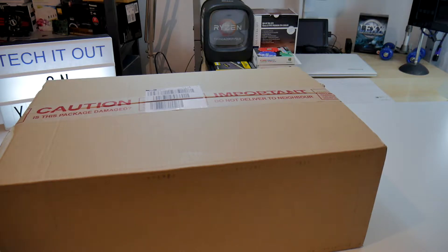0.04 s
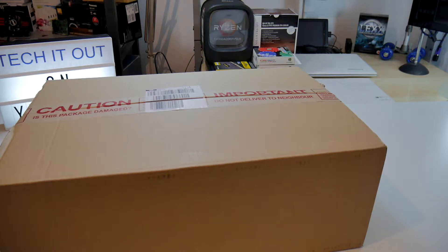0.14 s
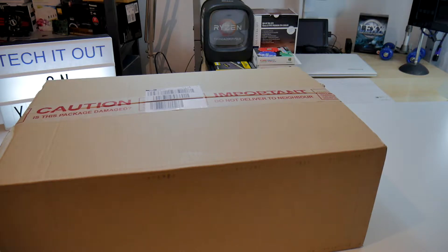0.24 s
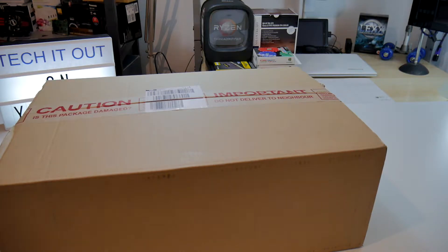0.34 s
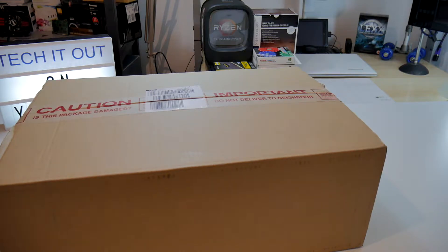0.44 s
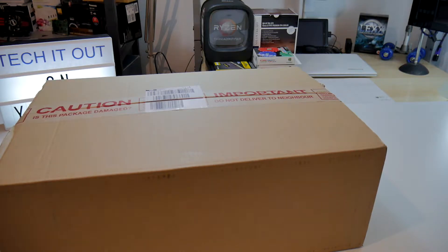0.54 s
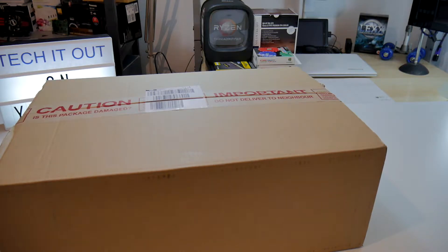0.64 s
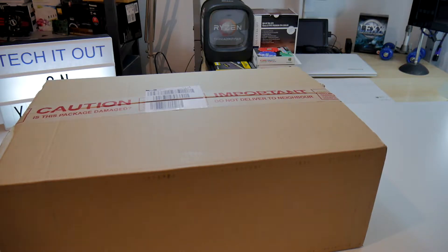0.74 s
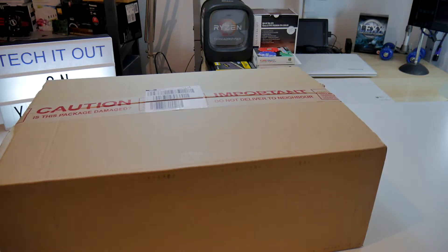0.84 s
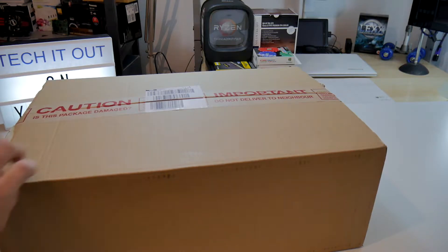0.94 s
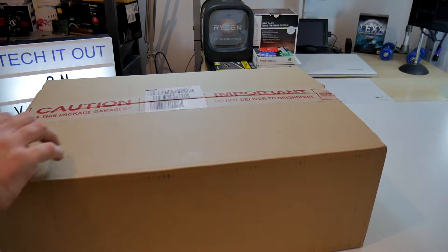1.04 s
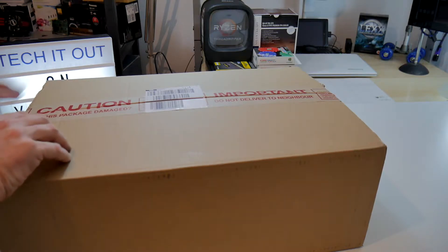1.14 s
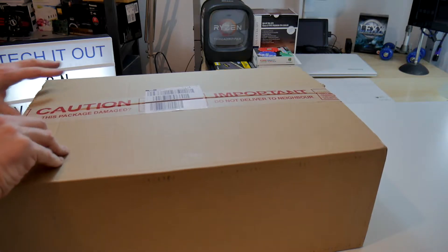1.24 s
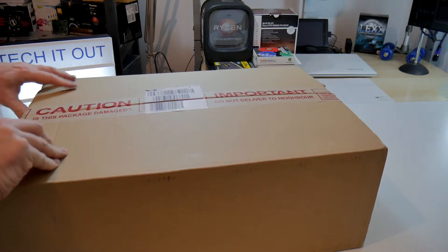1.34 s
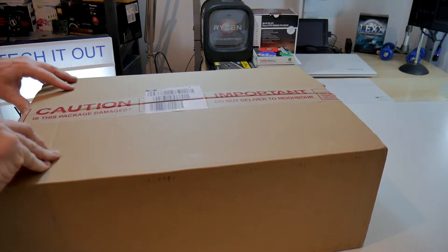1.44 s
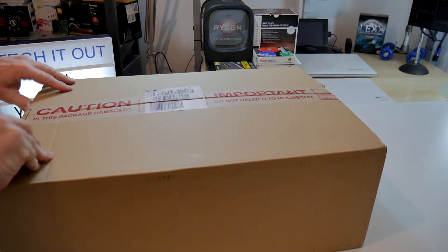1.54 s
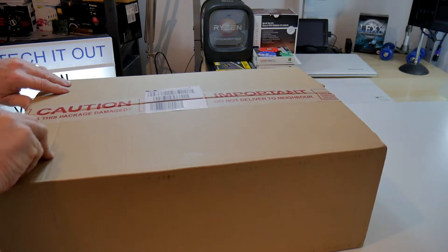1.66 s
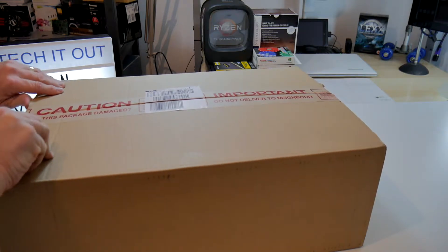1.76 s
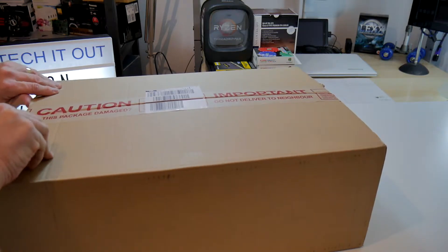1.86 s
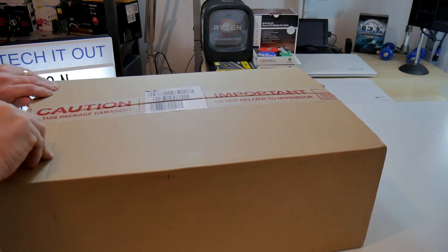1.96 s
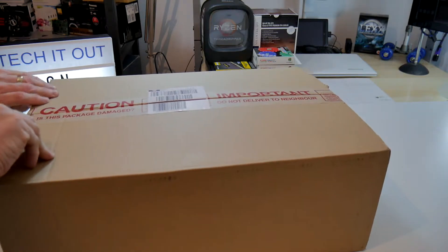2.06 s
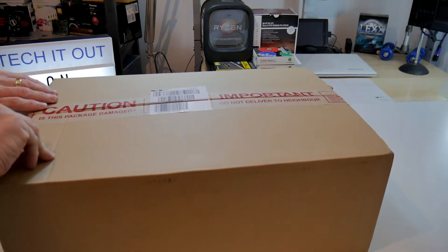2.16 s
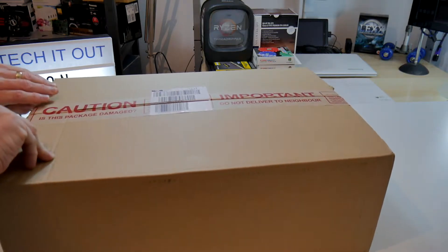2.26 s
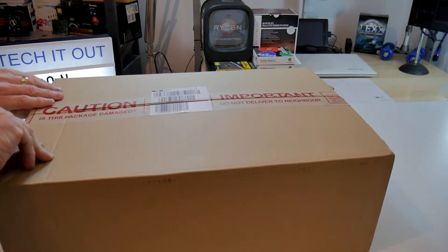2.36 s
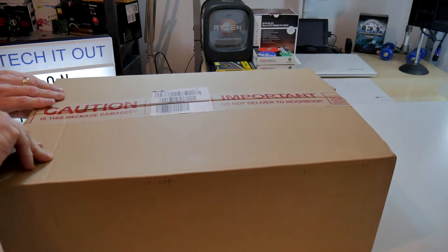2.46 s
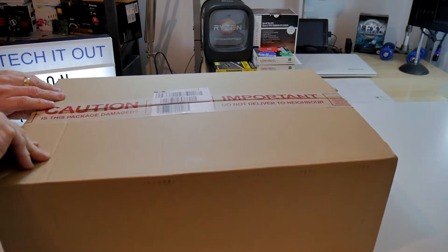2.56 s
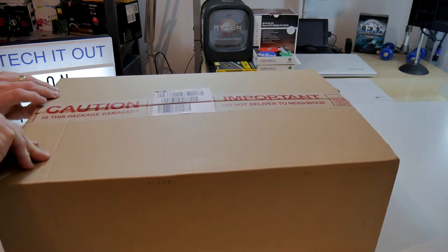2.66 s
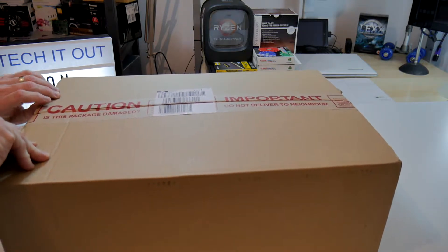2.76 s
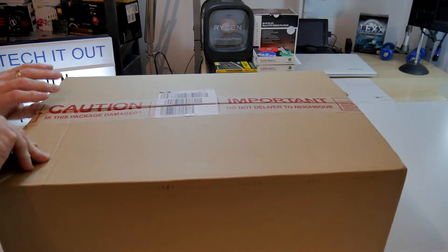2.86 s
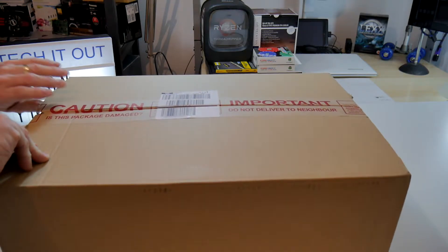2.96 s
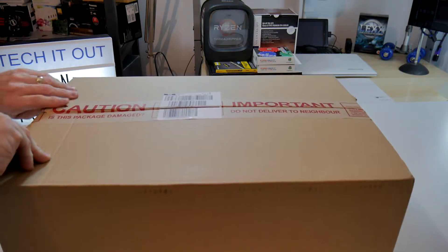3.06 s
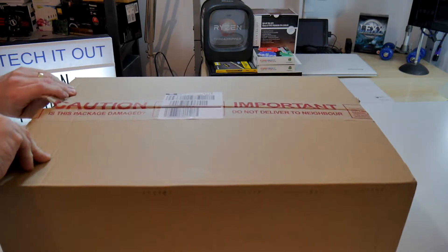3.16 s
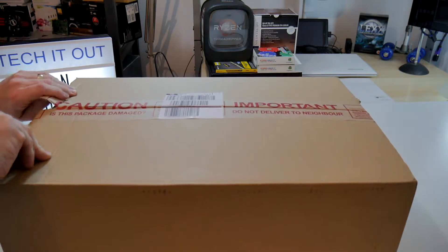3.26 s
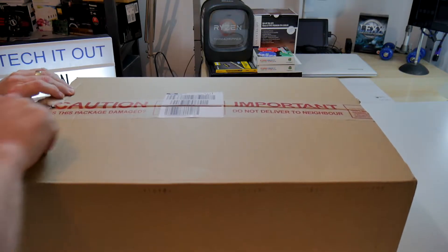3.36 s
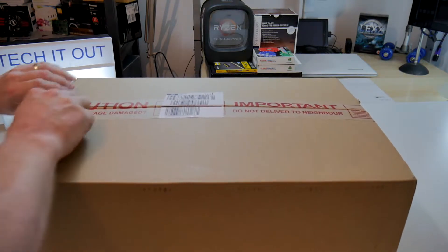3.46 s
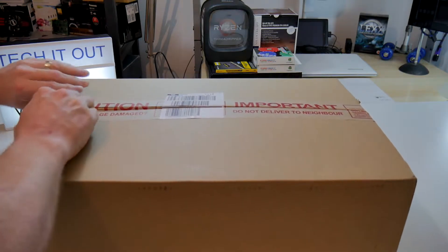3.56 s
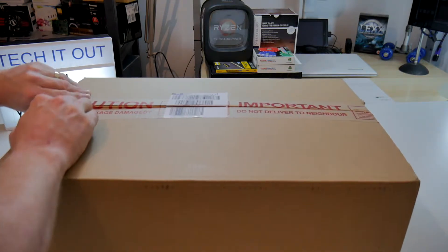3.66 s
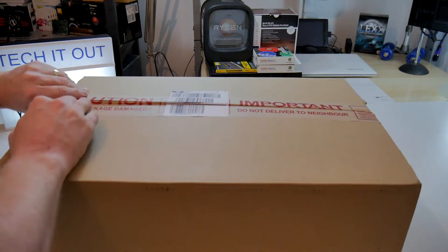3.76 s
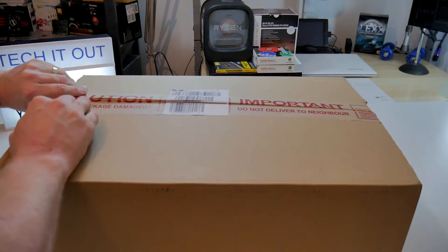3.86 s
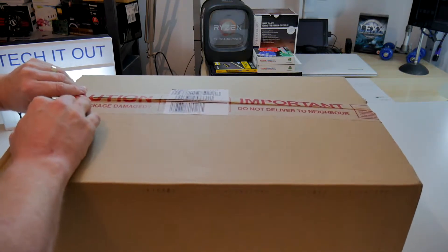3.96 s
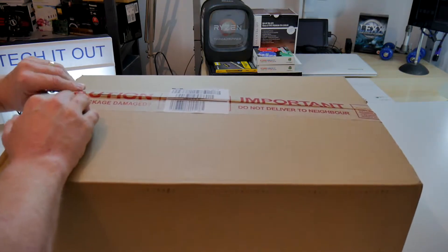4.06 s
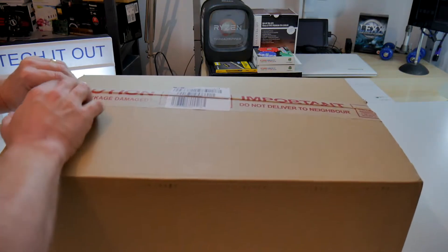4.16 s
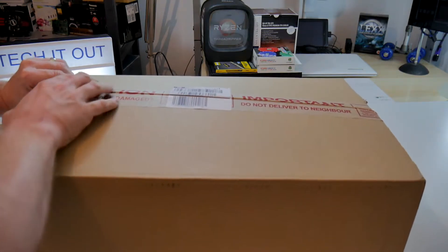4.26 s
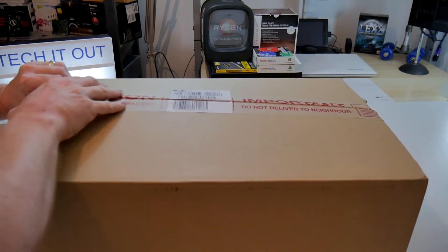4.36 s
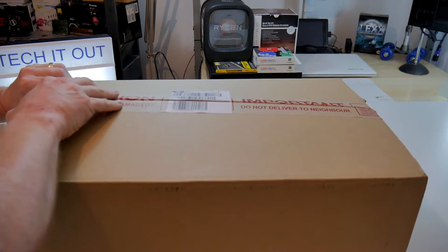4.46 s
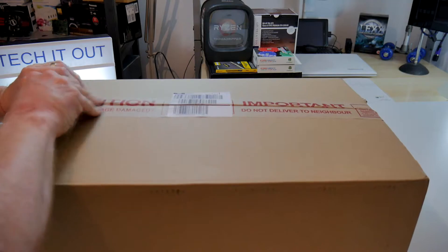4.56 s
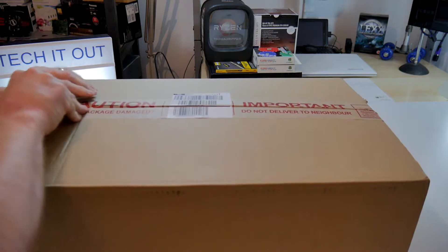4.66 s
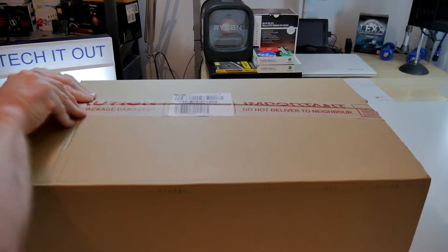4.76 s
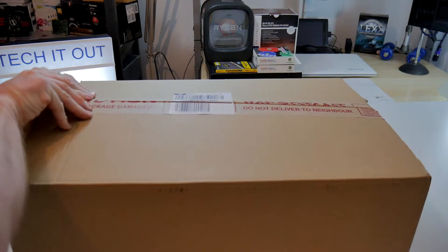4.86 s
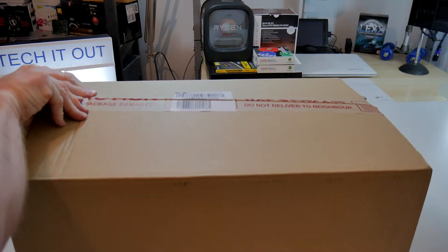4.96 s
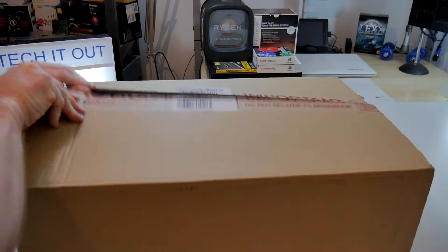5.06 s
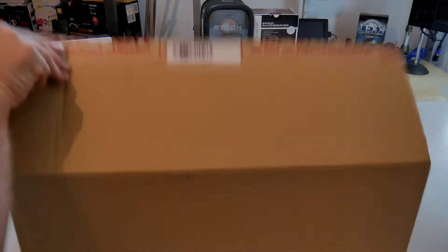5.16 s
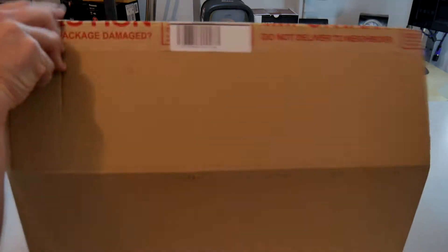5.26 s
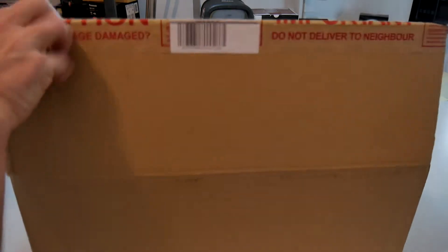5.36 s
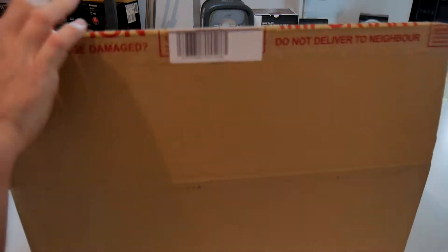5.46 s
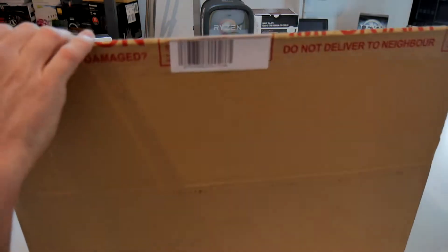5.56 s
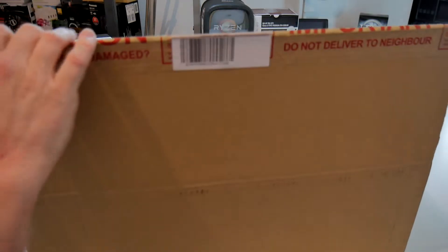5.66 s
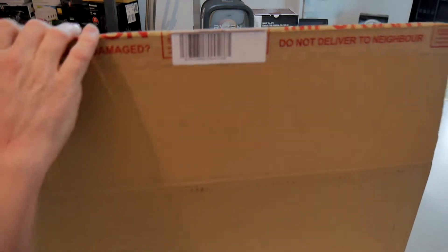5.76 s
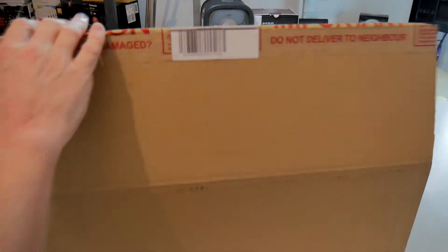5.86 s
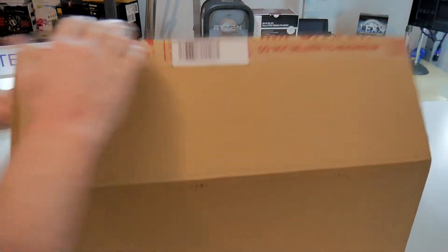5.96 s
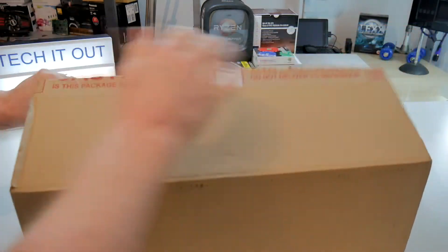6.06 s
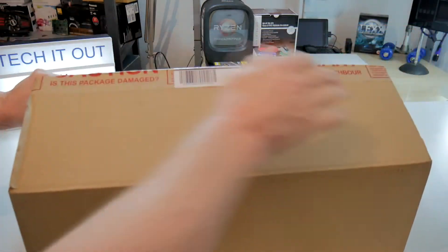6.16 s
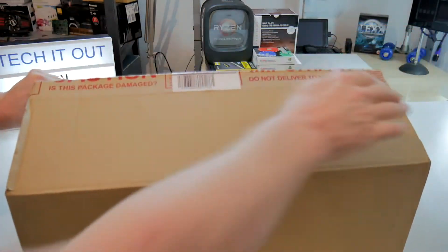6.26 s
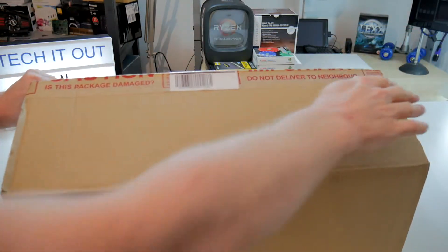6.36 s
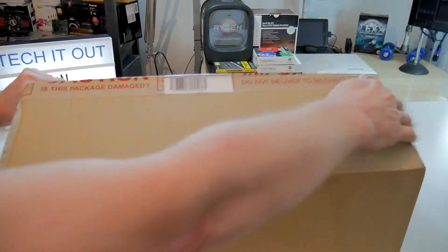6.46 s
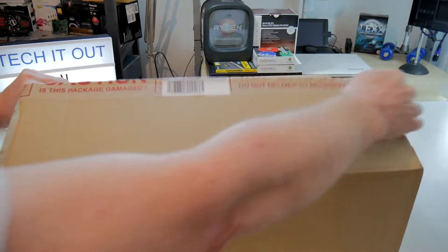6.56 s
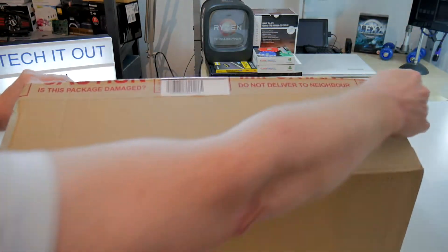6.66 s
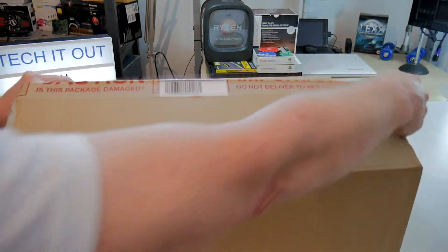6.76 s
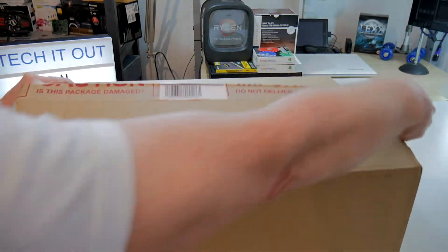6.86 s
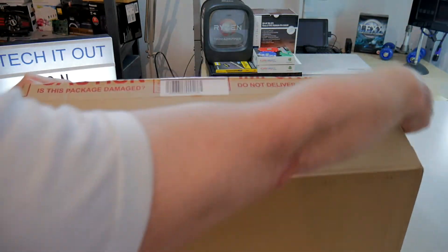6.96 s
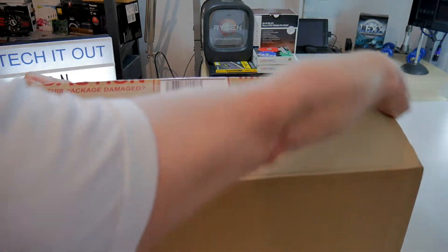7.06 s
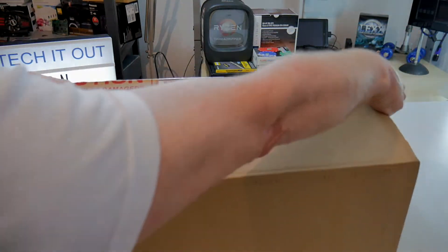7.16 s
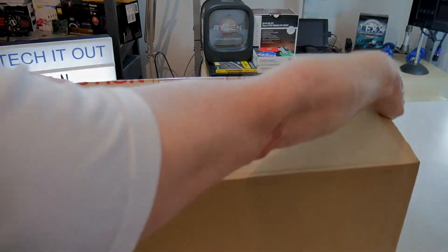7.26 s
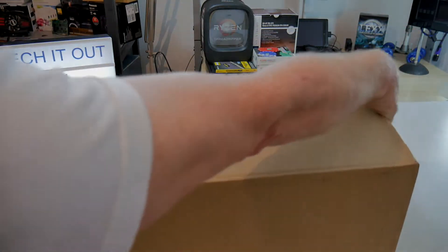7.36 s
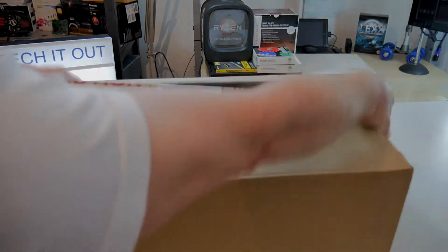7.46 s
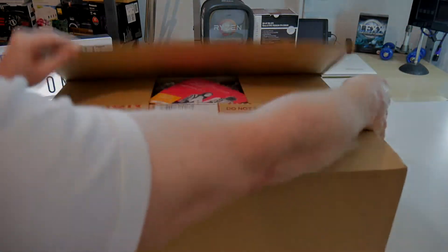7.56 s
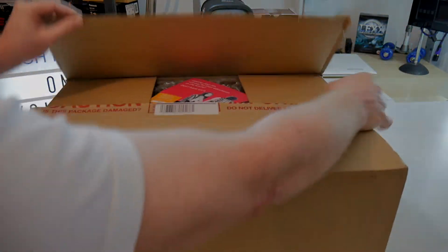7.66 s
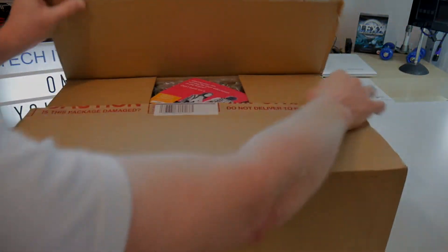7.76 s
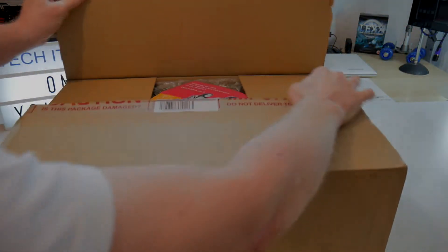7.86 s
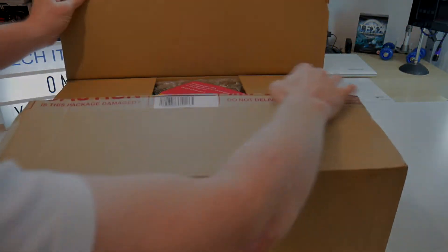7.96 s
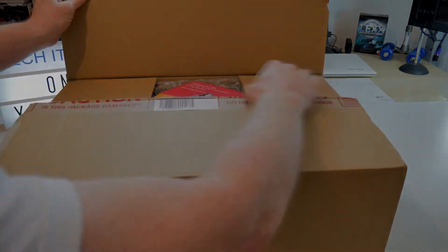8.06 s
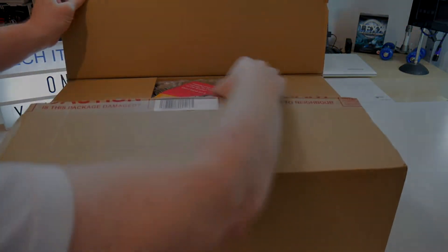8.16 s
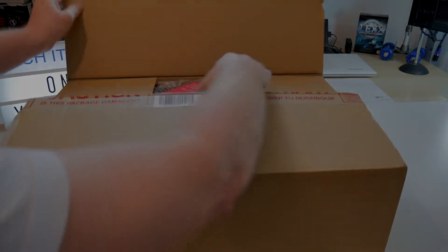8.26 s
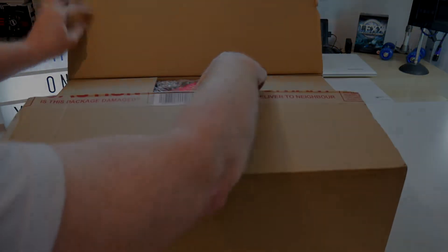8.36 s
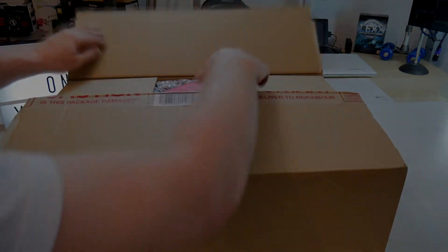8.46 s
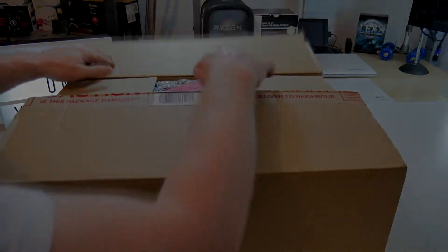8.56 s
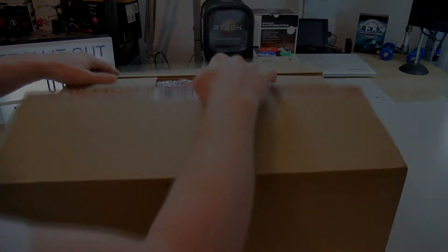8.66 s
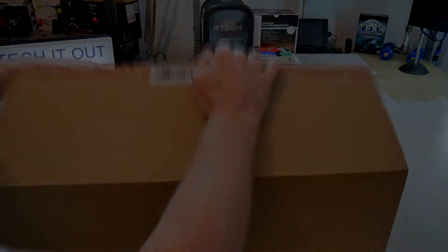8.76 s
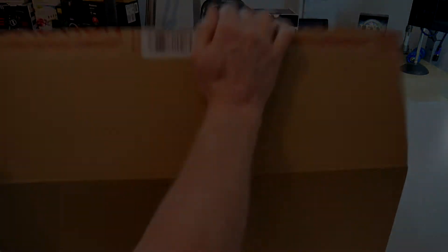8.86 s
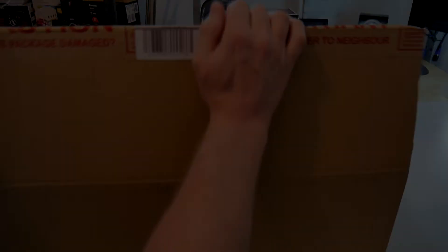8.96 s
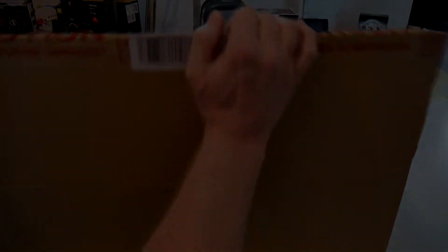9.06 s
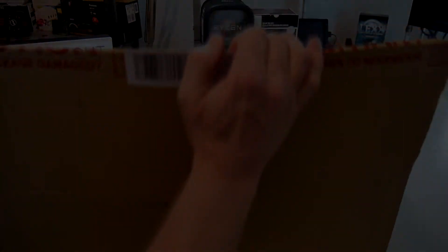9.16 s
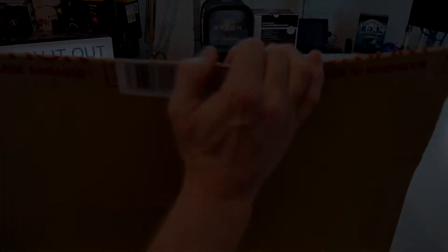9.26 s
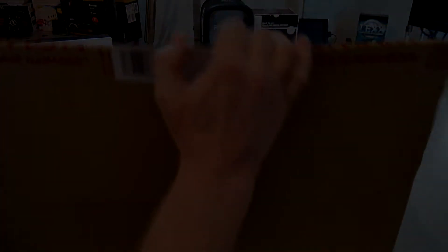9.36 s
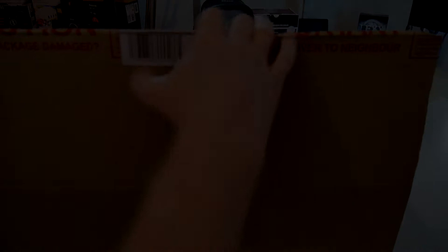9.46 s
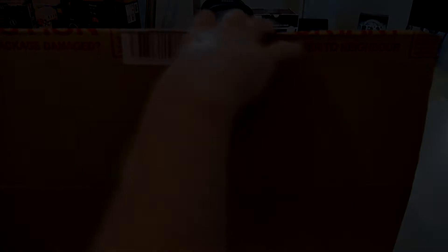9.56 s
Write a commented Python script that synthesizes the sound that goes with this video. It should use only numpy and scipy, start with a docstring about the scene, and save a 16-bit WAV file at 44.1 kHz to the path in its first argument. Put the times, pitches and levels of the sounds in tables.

```python
"""A small, lively room: hands open the flaps of a corrugated cardboard box on a desk.
Two hollow clicks come first, the second one double, as short impulses through hollow resonances.
Then tape ends and flaps snap, knock and thump as noise bursts, and fingers scrape as grainy noise;
all of these ring the same box modes. Sparse pops crackle, fingertips tick as damped sines, the desk rumbles.
A fan hums as a wavering sine and the microphone hisses faintly as shaped noise."""
import sys
import numpy as np
from scipy import signal
from scipy.fft import rfft, irfft, next_fast_len
from scipy.io import wavfile
from scipy.ndimage import uniform_filter1d

SR = 44100
rng = np.random.default_rng(int(sys.argv[2]) if len(sys.argv) > 2 else 0)


def generate_wav(sig):
    """Save sig (samples, or channels by samples) to the path in sys.argv[1] as 16-bit PCM at SR."""
    pcm = np.round(np.clip(np.atleast_2d(sig).T, -1, 1) * 32767).astype(np.int16)
    wavfile.write(sys.argv[1], SR, pcm)


N = 423801  # length in samples

# Side level by frequency, used for the quiet noise and the tail.
# Each row: frequency in Hz, side level against mid in dB before any offset.
SIDE_LEVEL = [(40, -43), (150, -19.5), (1000, -17), (4000, -9), (8000, -6.5), (14000, -10)]


def amp(db):
    """Amplitude factor from dB."""
    return 10 ** (np.asarray(db) / 20)


def unit(x):
    """Scale a signal to an RMS of 1."""
    return x / np.sqrt(np.mean(x ** 2))


def over_hz(table, size):
    """A (Hz, value) table read on the bins of a transform, straight on a log axis."""
    hz, value = np.transpose(table)
    bins_hz = np.fft.rfftfreq(size, 1 / SR) + 1  # the 1 keeps the log finite
    return np.interp(np.log(bins_hz), np.log(hz), value)


def ring(x, hz, width_hz):
    """One resonance, gain 1 at the centre."""
    b, a = signal.iirpeak(hz, hz / max(width_hz, 2), fs=SR)
    return signal.lfilter(b, a, x)


def walk(rate):
    """Random levels held 1 / rate s and slewed twice."""
    hold = int(SR / rate)
    steps = np.repeat(rng.standard_normal(N // hold + 1), hold)
    return uniform_filter1d(uniform_filter1d(steps, hold), hold)[:N]


def swell(s, db, rise, fall):
    """Power that climbs 20 dB in rise s up to its peak and drops 20 dB in fall s, once per millisecond."""
    late = np.arange(N * 1000 // SR + 1)[:, None] / 1000 - s
    steps = np.where(late < 0, -late / np.maximum(rise, .01), late / np.maximum(fall, .01))
    return amp(db - 20 * steps) ** 2


def per_sample(power):
    """Gain per sample from power per millisecond."""
    return np.interp(np.arange(N) * 1000 / SR, np.arange(len(power)), np.sqrt(power))


def body(drive, modes, parts_hz):
    """Each drive rings the modes around its own centre, at unit power; a high-pass thins what lies below them."""
    click = np.zeros(8192)
    click[0] = 1
    # neighbouring modes swing in opposite sense
    rings = np.array([(-1) ** k * amp(db) * ring(click, hz, width_hz)
                      for k, (hz, width_hz, db) in enumerate(modes)])
    modes_log_hz = np.log(np.array(modes)[:, 0])
    out = 0
    for mine, x in zip(np.eye(len(parts_hz)), drive):
        share = np.interp(modes_log_hz, np.log(parts_hz), mine) ** 2
        part = share @ rings
        out = out + signal.oaconvolve(x, part / np.linalg.norm(part))[:N]
    return signal.sosfilt(signal.butter(3, 0.67 * modes[0][0], "high", fs=SR, output="sos"), out)


def box(drive):
    """The cardboard rings in five parts, from deep boom to air."""
    # Modes of the box. Each row: frequency in Hz, width in Hz, level in dB.
    box_modes = [(138.6, 61, -3.5), (172.7, 67.6, -2), (217, 61.5, -2.5), (275, 33, 1), (350, 75, -1.5),
                 (478.4, 72, -2.5), (599, 126, -4), (725, 115, 1.5), (1049, 240, -1.5), (1317, 227, -0.5),
                 (1520, 298, 0), (1908, 288, 1), (2214, 310, 2), (2685, 560, 1.5), (3620, 960, -0.5),
                 (5560, 1400, 0), (7000, 1600, -31), (6900, 1400, -24), (10040, 2300, 5.5),
                 (13600, 20600, -2)]
    # Centres of the five parts, two booms, panel, surface and air, in Hz.
    box_centres = [200, 450, 1300, 4000, 10500]
    return body(drive, box_modes, box_centres)


def colour(weight_db, bright_db, deep_db, air_db):
    """dB for the five parts of the box: weight lifts both booms over the panel, brightness the surface and air."""
    air_slope = 1.01  # dB of air per dB of brightness
    return np.array([weight_db + deep_db, weight_db, 0 * weight_db, bright_db, air_slope * bright_db + air_db])


def quiet():
    """Room air and microphone hiss are shaped stereo noise; the fan hum is a sine of wavering pitch and level."""
    # Spectrum of the air and hiss. Each row: frequency in Hz, relative density in dB.
    air_spectrum = [(74, -53), (125, -22.5), (166, -7.5), (177, -9.5), (199, -1.5), (221, -10.5),
                    (287, -12), (573, -10.5), (914, -17), (6820, -27), (14200, -22), (16000, -21)]
    noise_db, hum_hz, hum_db = -57.5, 94.2, -57.5
    size = next_fast_len(N)
    mid, side = rfft(rng.standard_normal((2, size))) * amp(over_hz(air_spectrum, size))
    side = irfft(side * amp(over_hz(SIDE_LEVEL, size)), size)[:N]
    mid = irfft(mid, size)[:N]
    air = np.array([mid + side, mid - side]) * amp(noise_db) / np.std(mid)
    phase = 2 * np.pi * np.cumsum(hum_hz + 2.64 * walk(7.7)) / SR
    hum = amp(hum_db + 1.0 * walk(6.8)) * np.sqrt(2) * np.sin(phase)
    return air + hum


def desk():
    """Two low modes of the desk, shaken at random; left and right feel nearly the same."""
    # The desk shudders under the box. Each row: time of the peak in seconds, level in dB,
    # fall by 20 dB in seconds.
    shudders = [(.42, -55.5, 2.1), (1.55, -54.5, 0.81), (2.59, -53, 1.1), (3.18, -41.5, 0.65),
                (3.45, -58, 0.38), (4.09, -43.5, 0.79), (4.71, -61, 0.14), (5.06, -47, 0.95),
                (5.99, -54, 2), (6.5, -47, 0.099), (6.77, -43.5, 0.2), (7.36, -38, 0.26), (7.49, -41, .4),
                (8.46, -58, .6), (9.21, -51.5, 0.42)]
    rise_s, rest_db = 0.15, -65
    shake, side = rng.standard_normal((2, N))
    shake = shake + amp(-29) * side * np.array([[1], [-1]])
    s, db, fall = np.transpose(shudders)
    power = swell(s, db, rise_s, fall).sum(axis=1) + amp(rest_db) ** 2
    rumble = ring(shake, 41.7, 11.5) - amp(4.0) * ring(shake, 71.4, 14)
    return per_sample(power) * unit(rumble)


def clicks():
    """A small hollow object answers each click with its low and high hollows."""
    # Two clicks, the second one double. Each row: start in seconds,
    # then the drive in dB for each of the four centres below.
    click_drives = [(0.416, -12.5, -5, -8.5, 1), (0.7039, -9, -2.5, -6, -21), (.717, -7, -5, -10, -14)]
    # Modes of the hollow object. Each row: frequency in Hz, width in Hz, level in dB.
    hollow_modes = [(326, 72, 10), (560, 230, 2.5), (730, 8.1, 15), (834, 125, 7.5), (1162, 430, 0),
                    (1570, 330, 2), (2090, 250, 3.5), (2280, 220, 7.5), (2500, 390, 5.5), (3020, 350, 0.5),
                    (4640, 460, -10.5), (6660, 1600, -26)]
    # Centres of its four parts in Hz.
    hollow_centres = [350, 700, 950, 2800]
    drive = np.zeros((4, N))
    for s, *part_db in click_drives:
        drive[:, int(s * SR)] = amp(part_db)
    return body(drive, hollow_modes, hollow_centres)


def rub():
    """Skin and board stick and slip: dense grains of uneven size over a smooth hiss, in short gusts.
    Gives the sound and its panel level."""
    # Single scrapes and rustles. Each row: time of the peak in seconds, level in dB, rise in seconds,
    # fall in seconds (both over 20 dB), weight in dB, brightness in dB.
    scrapes = [(1.5, -39.5, .05, 0.039, -8, -4), (1.67, -49.5, 0.19, 0.44, -2, -5.5),
               (2.03, -51.5, 0.16, 0.75, -4.5, -3), (2.54, -50.5, 0.035, 0.092, 7.5, 7),
               (3.07, -50.5, 0.1, .03, 8, -4), (3.12, -34, 0.026, 0.1, -15, -2),
               (3.429, -38, 0.15, 0.21, -4, -8.5), (3.55, -42.5, .1, 0.15, -9, -5),
               (3.72, -46.5, 0.097, 0.078, 0.5, -8), (4.059, -30, 0.047, .06, -6.5, -4),
               (4.16, -43.5, .12, 0.16, -7, -3.5), (4.3, -50, 0.074, 0.11, 4.5, -4.5),
               (4.59, -46, 0.18, 0.35, 1, -8), (4.76, -48, 0.092, 0.34, -2.5, -7.5),
               (5.0, -36, .02, 0.13, -6, 0), (5.05, -27, 0.055, 0.038, -1, -1), (5.1, -37, .1, 0.06, 0, -1),
               (5.19, -34.5, 0.11, 0.13, -2, -11), (5.36, -45.5, 0.11, 0.23, 2, -8),
               (5.901, -37.5, 0.054, 0.043, -7, -12), (6.08, -47, 0.025, 0.13, 8, -11),
               (6.54, -45.5, 0.13, 0.065, -15, -11), (6.711, -33.5, 0.016, 0.068, 2.5, -8.5),
               (7.06, -46.5, 0.096, 0.078, 4, -5), (7.32, -29.5, 0.021, 0.07, 1, -8),
               (7.46, -42.5, 0.36, .1, 3, -5), (7.5, -34.5, 0.044, 0.13, -8, -7),
               (7.561, -31.5, 0.037, 0.033, 9, -10.5), (7.75, -52.5, 0.25, 1, -4, -2.5),
               (8.23, -55.5, 0.21, 0.064, 3, -3.5), (8.33, -43.5, 0.021, 0.27, -5.5, -22),
               (8.42, -48.5, 0.27, 0.3, -22, -1), (9.39, -50, 0.2, 0.11, -3.5, -5.5),
               (9.46, -45, 0.058, 0.06, 5.5, -13.5)]
    # Hands resting and sliding on the board, joined by straight lines.
    # Each row: time in seconds, level in dB, brightness in dB.
    contact = [(.98, -96, -10), (1.07, -59.5, -2.5), (1.46, -55.5, -8), (1.9, -67, -1), (2.15, -61, -21),
               (2.29, -65, -25), (2.34, -56, -15), (2.9, -54, -5), (3.85, -54.5, -4.5), (3.96, -62.5, -2),
               (4.9, -63.5, -1), (5.671, -72, -4), (5.72, -56, -6), (6.33, -53, -6.5), (7.03, -50.5, -9),
               (7.3, -55, -3.5), (7.63, -67, 3), (8.66, -83, -6), (8.69, -52, -4.5), (9.03, -53.5, -3),
               (9.29, -61, -7), (9.61, -57, -10)]
    contact_weight_db, deep_db, air_db = -1, -5, -5.5
    size_db = np.minimum(2.7 * rng.exponential(size=N), 8)
    grains = (rng.random(N) < 2200 / SR) * amp(size_db) * rng.standard_normal(N)  # about 2200 a second
    texture = unit(unit(grains) + 1.08 * rng.standard_normal(N))
    slip = texture * amp(1.07 * walk(30))

    s, db, rise, fall, weight_db, bright_db = np.transpose(scrapes)
    scrape_power = amp(colour(weight_db, bright_db, deep_db, air_db)) ** 2 @ swell(s, db, rise, fall).T

    s, db, bright_db = np.transpose(contact)
    t = np.arange(scrape_power.shape[1]) / 1000
    parts_db = db + colour(contact_weight_db + 0 * s, bright_db, deep_db, air_db)
    contact_power = amp([np.interp(t, s, part) for part in parts_db]) ** 2
    power = scrape_power + (t > s[0]) * contact_power  # no contact before the first row

    # each part of the box wanders in level by itself
    gain = np.array([per_sample(part) * amp(2.75 * walk(12)) for part in power])
    return box(gain * slip), gain[2]


def crackle(level):
    """Sparse single flutes of the board give way under the fingers, more loudly as the rubbing grows."""
    size_db = np.minimum(1.6 * rng.exponential(size=N), 10)
    pops = (rng.random(N) < 45 / SR) * amp(size_db) * rng.choice([-1, 1], N)  # about 45 a second
    return amp(-9) * level * unit(ring(ring(pops, 1320, 940), 1430, 2000))


def hits():
    """Each blow is a sharp crack and a quick tear of fibres; it drives the box and a ring of its own."""
    # Snaps and knocks. Each row: start in seconds, force in dB, weight in dB, brightness in dB,
    # own ring in Hz, ring level in dB.
    snaps = [(1.053, -33, 8, -13, 1350, -2.5), (1.499, -11.5, 5, 2, 1540, 3),
             (1.635, -23.5, 7.5, -17, 720, -7), (1.961, -27.5, 8, -20, 654, -6),
             (2.532, -7, 4.5, 0, 1160, 11), (2.826, -30, 16, 5, 1710, -3), (2.993, -31, -8, 10.5, 982, -20),
             (3.112, 0.5, 2, -3, 677, 16), (3.128, -20.5, 19.5, 12, 750, 10), (3.547, -13, -15, 4, 3530, 2),
             (3.633, -22, 5.5, 4, 1920, 4), (3.844, -23.5, 5, 7.5, 1140, 4.5),
             (4.018, 1.5, -2.5, -1, 3500, 22), (4.062, -25, -7, 1, 3460, -5), (4.289, -20, -1, -15, 720, 0),
             (4.742, -18.5, 0, -12, 650, 4), (4.983, 5.5, -7, -1.5, 1250, 6),
             (5.032, 12, -3.5, -12, 1200, 12), (5.081, 4, 3, -15, 1090, 7),
             (5.173, 0, -6.5, -13.5, 1270, 1), (5.353, -23, -6, -11, 1450, -5),
             (5.708, -22.5, -5.5, -10, 1544, -16), (5.889, -16, -3, -9, 1230, -6),
             (5.909, -37, 14, -6, 1630, -9), (6.068, -20.5, 14.5, -18, 646, 7),
             (6.483, -22.5, 5, -7, 1442, -19), (6.539, -28, -18, -22, 1540, 0),
             (6.706, -12, -7, -16, 1170, 14.5), (6.75, -21.5, 17, -10, 1000, 5),
             (7.307, -4.5, 2, -5.5, 1010, 19.5), (7.494, -4.5, 2, -20, 1220, 21.5),
             (7.526, -9, -19, -10, 1150, 12), (7.559, -20, 14, 10, 1080, 11),
             (8.316, -30, -3, -13, 1210, 3), (8.684, -32, 7, -9, 1550, -9), (9.365, -22.5, 3, -3, 2090, 3),
             (9.438, -24, 9.5, -14, 775, -12)]
    decay_s, deep_db, air_db = 0.0035, -5, -9.5
    drive, own = np.zeros((5, N)), np.zeros(N)
    t = np.arange(4096) / SR
    envelope = np.exp(-t / decay_s) * (1 - np.exp(-t / (0.17 * decay_s)))
    tears = rng.standard_normal((len(snaps), len(t)))
    for tear, (s, db, weight_db, bright_db, hz, ring_db) in zip(tears, snaps):
        i = int(s * SR)
        burst = tear * envelope
        burst[0] = 7.7  # the crack
        burst /= np.linalg.norm(burst)
        force = amp(db + colour(weight_db, bright_db, deep_db, air_db))
        drive[:, i:i + len(t)] += force[:, None] * burst
        own[i:i + len(t)] += amp(ring_db) * ring(ring(burst, hz, 0.12 * hz), hz, .5 * hz)
    return box(drive) + own


def ticks():
    """Dry fingertip ticks close by: one damped sine with a soft onset for each."""
    # Each row: start in seconds, level in dB, ring in Hz, decay by 60 dB in seconds.
    taps = [(1.339, -39.5, 480, 0.039), (2.039, -31.5, 1330, 0.017), (2.271, -31, 1090, 0.01),
            (2.327, -35, 1210, .012), (2.37, -32.5, 1380, 0.011), (2.405, -30, 1350, 0.01),
            (2.518, -29, 1340, 0.016), (3.038, -38, 1500, 0.0116), (3.3, -30, 1000, .012),
            (7.452, -23, 496, 0.042), (8.2252, -29, 805, .025)]
    out, t = np.zeros(N), np.arange(2048) / SR
    for s, db, hz, t60 in taps:
        i = int(s * SR)
        onset = 1 - np.exp(-t * hz * 2)
        out[i:i + len(t)] += amp(db - 60 * t / t60) * np.sin(2 * np.pi * hz * t) * onset
    return out


def thumps():
    """Palm and flap move the whole box: a soft, long push that drives only its deepest part."""
    # Dull thumps. Each row: start in seconds, force in dB.
    shoves = [(1.634, -30), (2.535, -9.5), (2.605, -21), (3.114, 4), (3.844, -18), (4.029, -8), (5.05, 0),
              (5.09, -3), (5.888, -14), (6.068, -7.5), (6.484, -12), (6.709, -10), (6.75, -14),
              (7.047, -27), (7.321, -12), (7.56, -13), (9.437, -14)]
    push_s = 0.0054  # the push is strongest here
    drive = np.zeros((5, N))
    t = np.arange(4096) / SR
    pushes = rng.standard_normal((len(shoves), len(t))) * t * np.exp(-t / push_s)
    for push, (s, db) in zip(pushes, shoves):
        i = int(s * SR)
        drive[0, i:i + len(t)] += amp(db) * push / np.linalg.norm(push)
    return box(drive)


def tail():
    """One diffuse tail of decaying noise, built octave by octave: mid and a weaker side."""
    # Decay of the room. Each row: frequency in Hz, decay by 60 dB in seconds.
    decay_times = [(60, 0.5), (250, 0.27), (1000, 0.34), (4000, 0.31), (12000, 0.09)]
    tail_db = -0.5
    size = SR // 2
    t = np.arange(size) / SR
    decay_hz, decay_s = np.transpose(decay_times)
    tails = np.zeros((2, size))
    for hz in 60 * 2. ** np.arange(9):
        t60 = np.interp(np.log(hz), np.log(decay_hz), decay_s)
        shape = amp(-60 * t / max(t60, .05)) * (1 - np.exp(-t / 0.0058))  # the tail builds up first
        edges = [hz / np.sqrt(2), min(hz * np.sqrt(2), .45 * SR)]
        octave = signal.butter(2, edges, "band", fs=SR, output="sos")
        band = signal.sosfilt(octave, rng.standard_normal((2, size)))
        tails += band * shape / np.linalg.norm(shape)
    mid, side = amp(tail_db) * tails
    return mid, irfft(rfft(side) * amp(over_hz(SIDE_LEVEL, size) - 9), size)


def room(x, sent, count=6):
    """Direct sound, early echoes and a tail; the hands move on, so the answer of the room keeps changing."""
    # Echoes of desk and near walls. Each row: nominal delay in seconds, level in dB.
    reflections = [(.0035, -8.5), (.011, -9), (.019, -17)]
    place = np.arange(N) / SR / .11 % count  # a new place every 0.11 s, in a cycle
    out = 0
    for k in range(count):
        distance = np.abs((place - k + count / 2) % count - count / 2)
        share = np.sqrt(np.clip(1 - distance, 0, 1))  # equal-power crossfade
        mid, side = tail()
        for s, db in reflections:
            mid[int(s * SR * rng.uniform(.9, 1.1))] += amp(db)
        answer = np.array([mid + side, mid - side])
        out = out + signal.fftconvolve((sent * share)[None], answer, axes=1)[:, :N]
    return (out + x) * amp(-1.5)


def scene():
    """Mix the near sounds, send clicks, blows and rubbing to the room, then add ticks, desk and quiet."""
    hollow = clicks()
    blows = hits() + thumps()
    rubbing, level = rub()
    near = amp(-15.0) * hollow + blows + rubbing + amp(3.0) * crackle(level)
    sent = hollow + amp(0.6) * blows + amp(-4.5) * rubbing
    return room(near, sent) + ticks() + desk() + quiet()


def record(dry):
    """The recorder cuts the deepest bass and the top."""
    low_hz, top_hz = 36, 15800
    dry = signal.sosfilt(signal.butter(3, low_hz, "high", fs=SR, output="sos"), dry)
    return signal.sosfilt(signal.ellip(10, .2, 70, top_hz, fs=SR, output="sos"), dry)


dry = scene()
out = record(dry)
generate_wav(out)
```